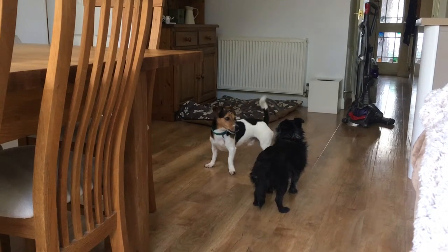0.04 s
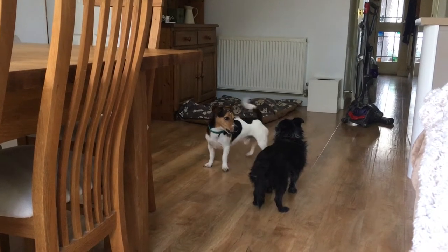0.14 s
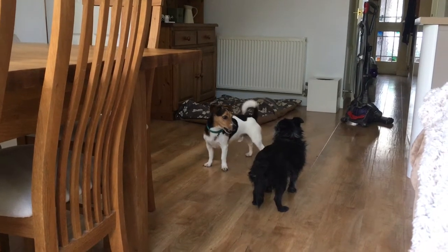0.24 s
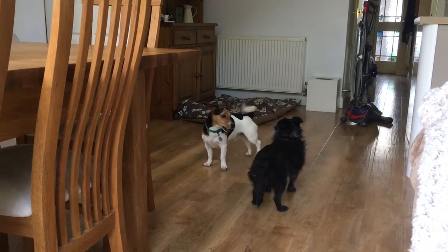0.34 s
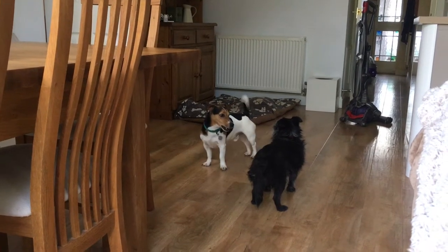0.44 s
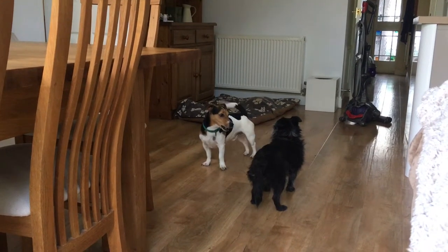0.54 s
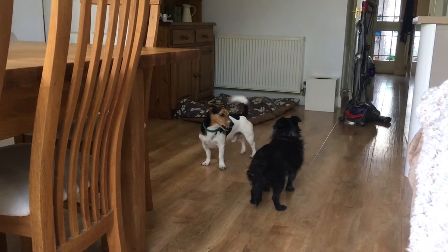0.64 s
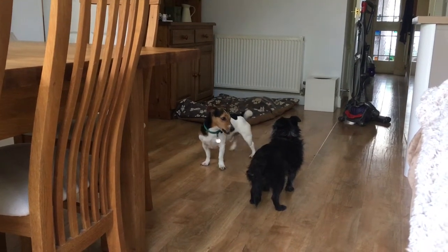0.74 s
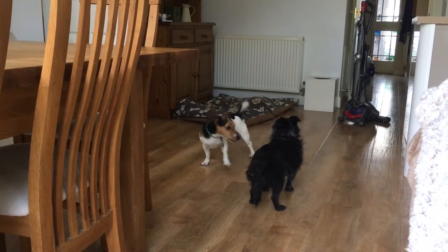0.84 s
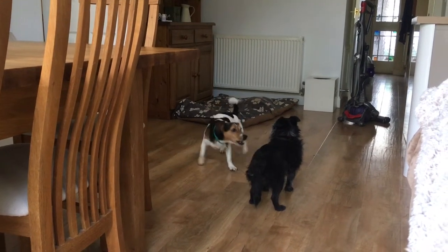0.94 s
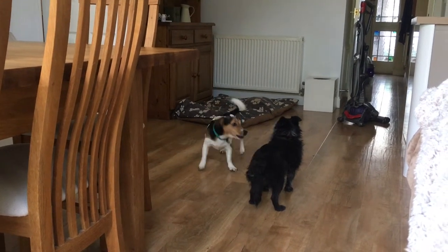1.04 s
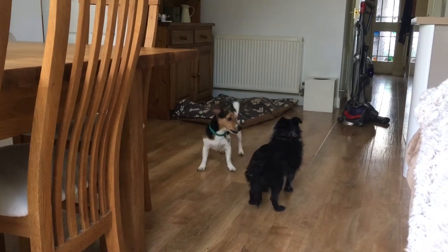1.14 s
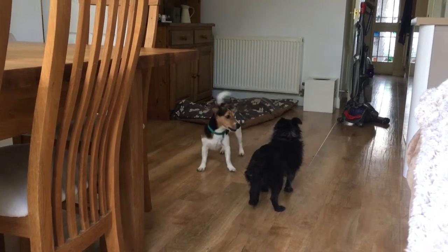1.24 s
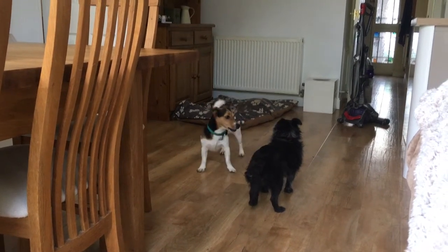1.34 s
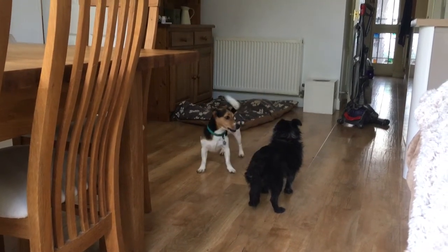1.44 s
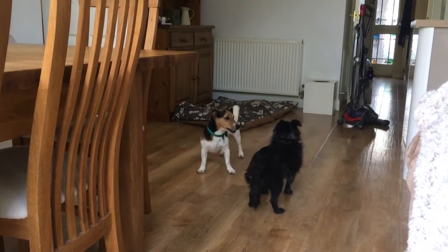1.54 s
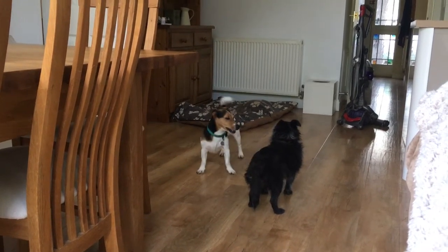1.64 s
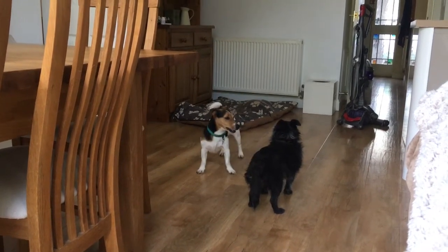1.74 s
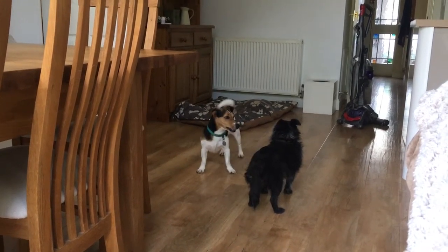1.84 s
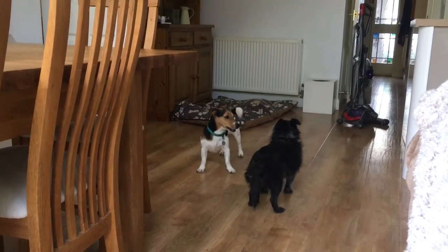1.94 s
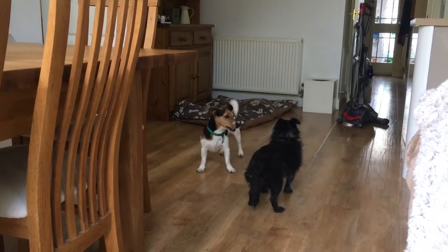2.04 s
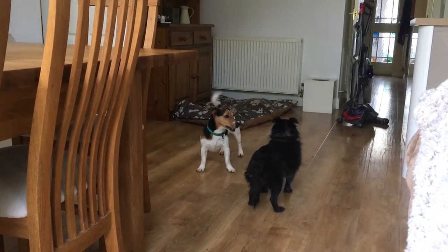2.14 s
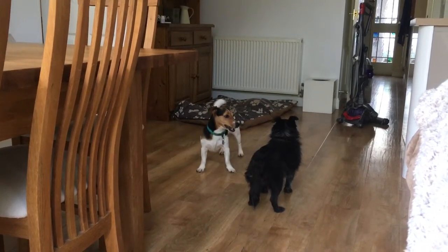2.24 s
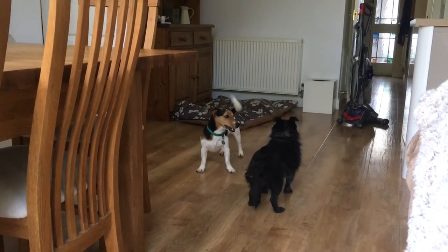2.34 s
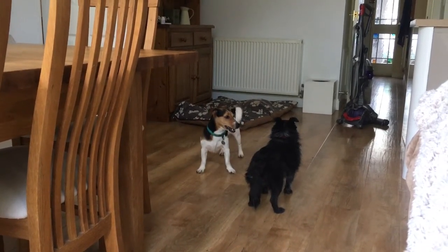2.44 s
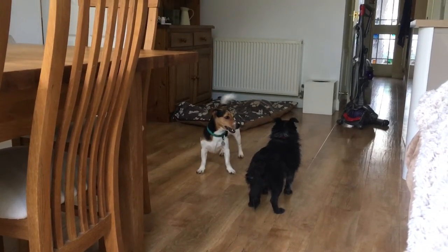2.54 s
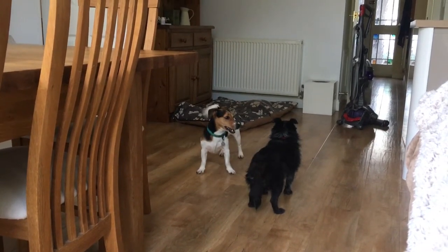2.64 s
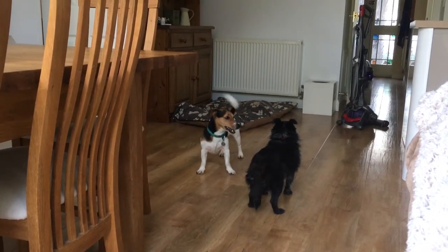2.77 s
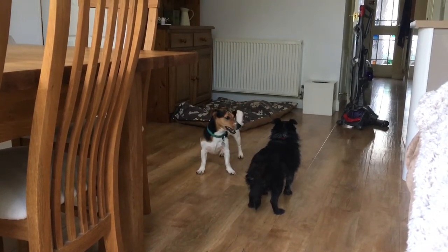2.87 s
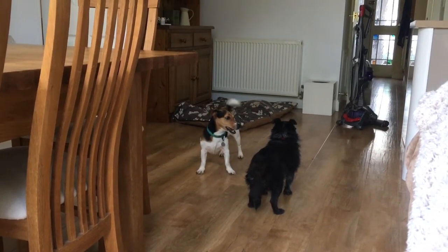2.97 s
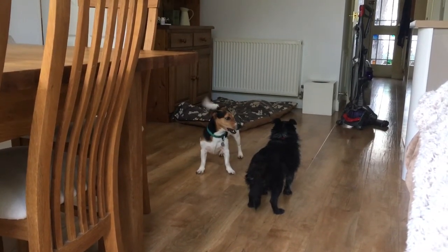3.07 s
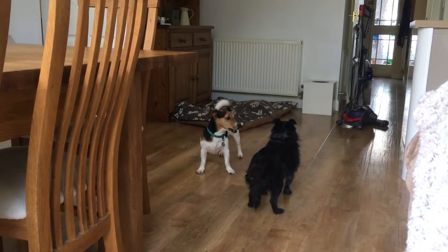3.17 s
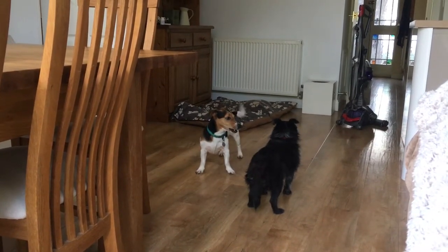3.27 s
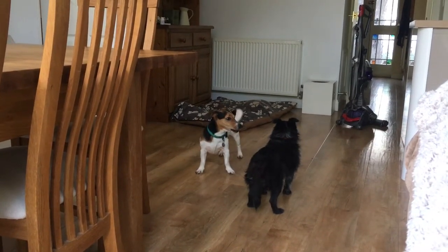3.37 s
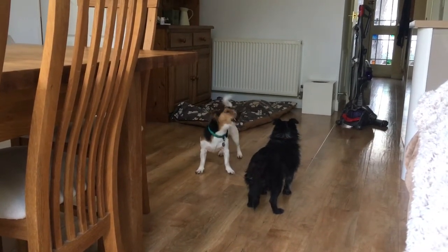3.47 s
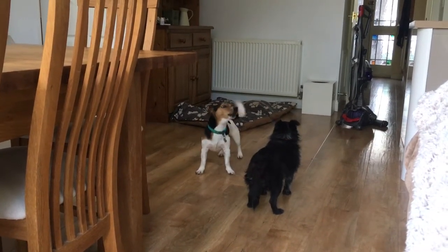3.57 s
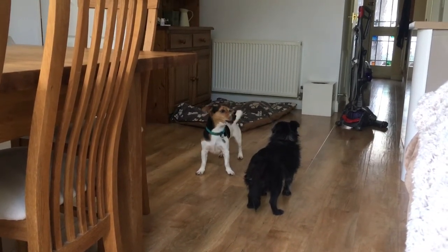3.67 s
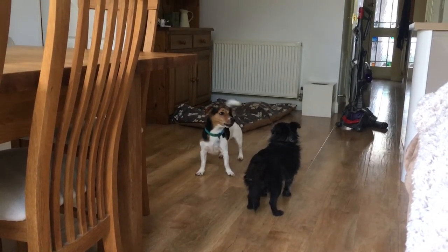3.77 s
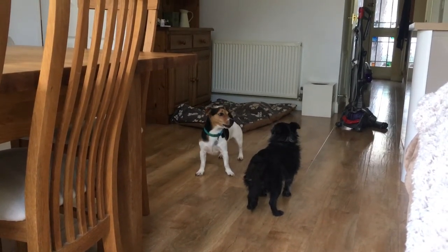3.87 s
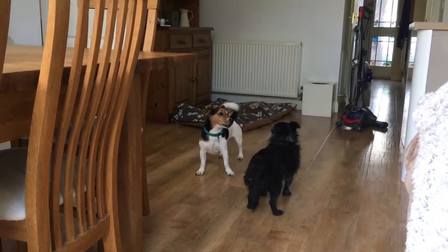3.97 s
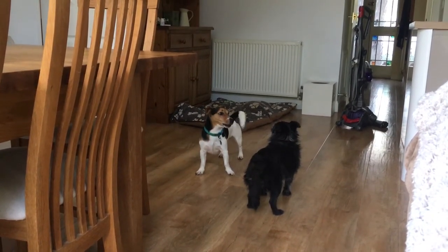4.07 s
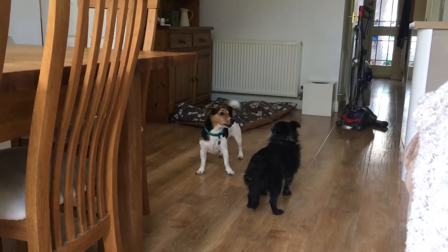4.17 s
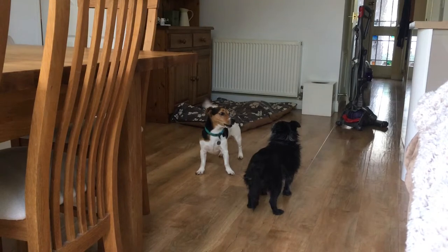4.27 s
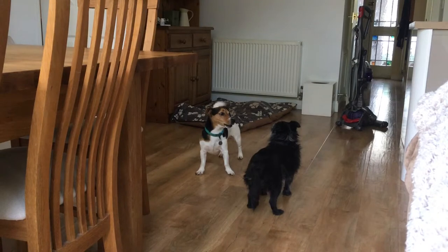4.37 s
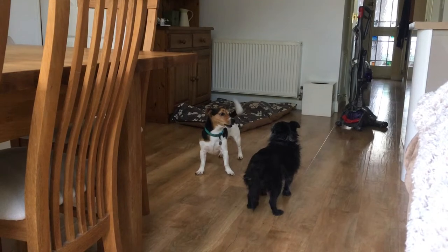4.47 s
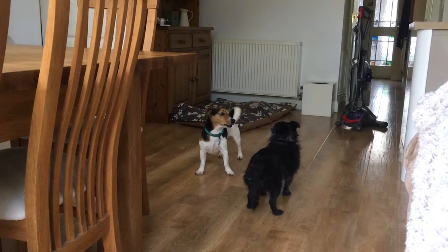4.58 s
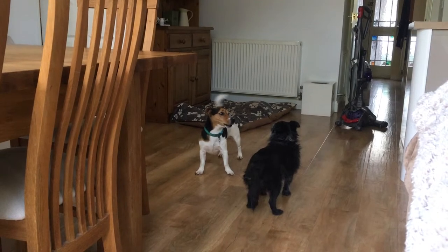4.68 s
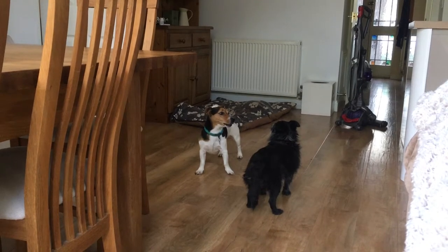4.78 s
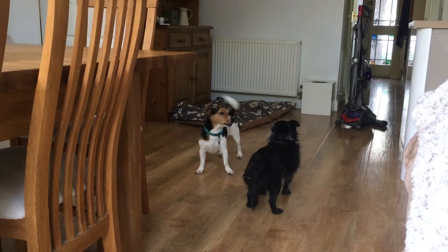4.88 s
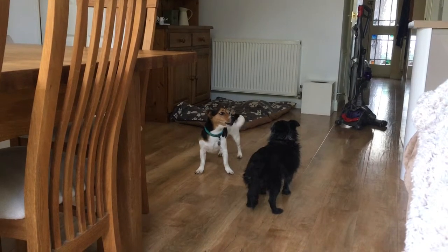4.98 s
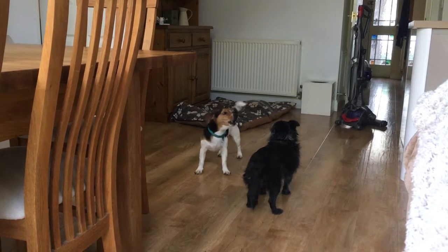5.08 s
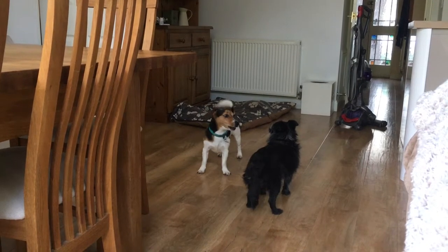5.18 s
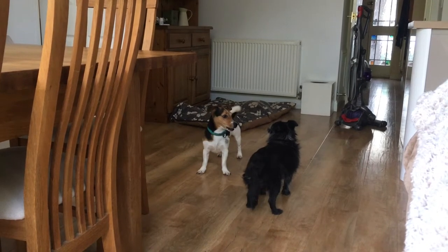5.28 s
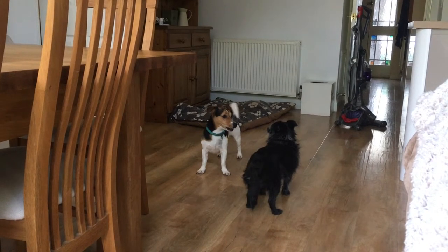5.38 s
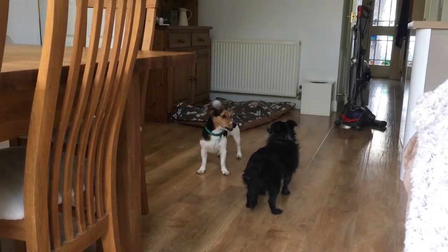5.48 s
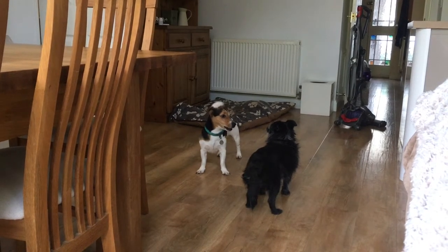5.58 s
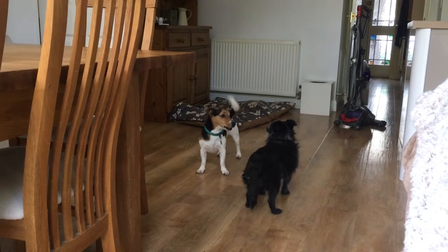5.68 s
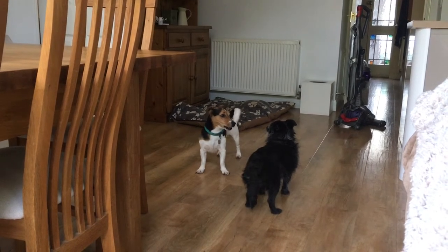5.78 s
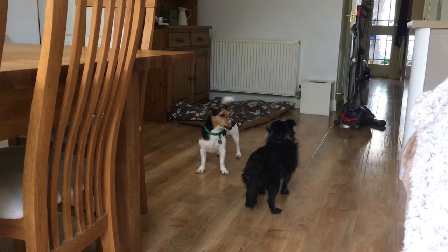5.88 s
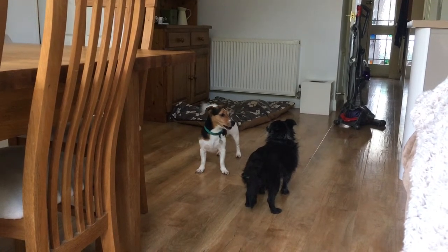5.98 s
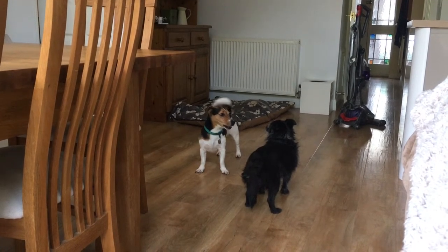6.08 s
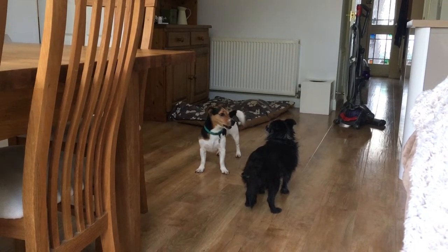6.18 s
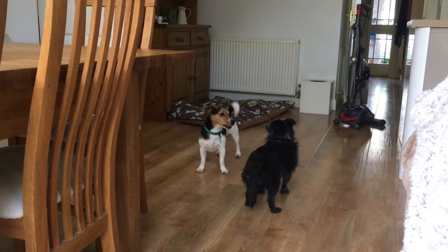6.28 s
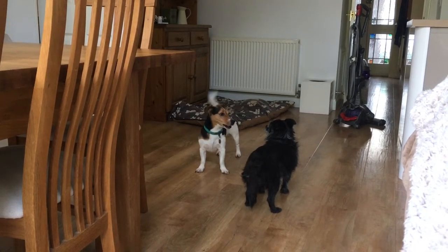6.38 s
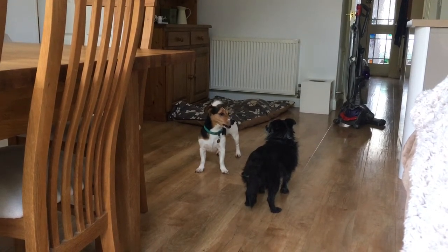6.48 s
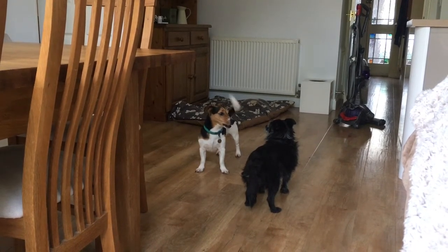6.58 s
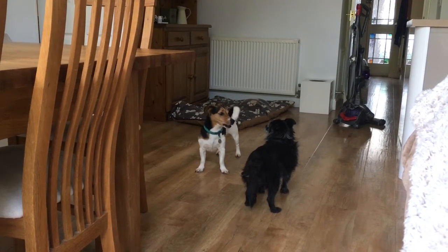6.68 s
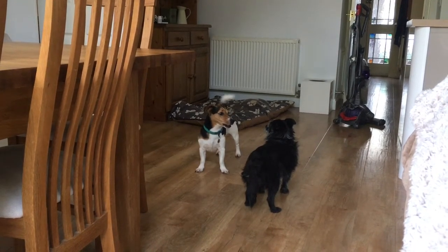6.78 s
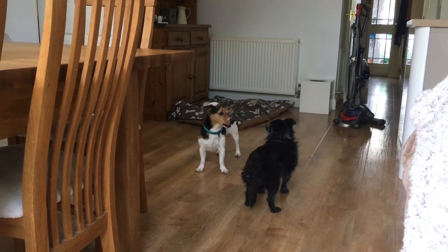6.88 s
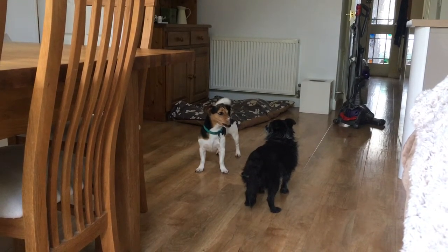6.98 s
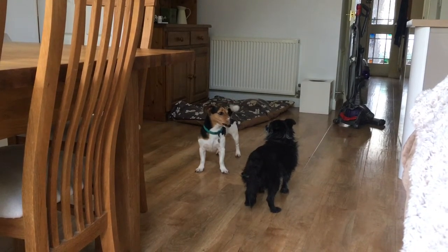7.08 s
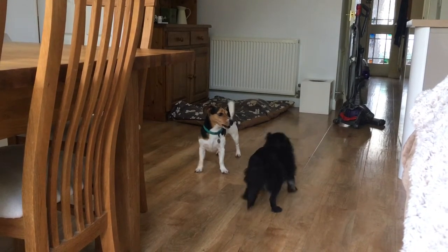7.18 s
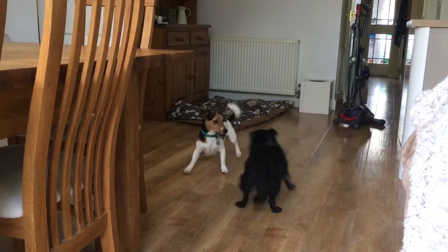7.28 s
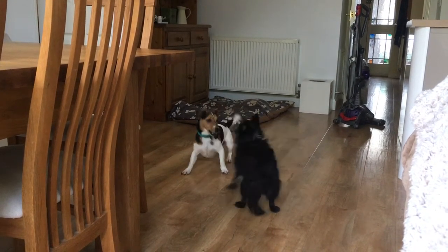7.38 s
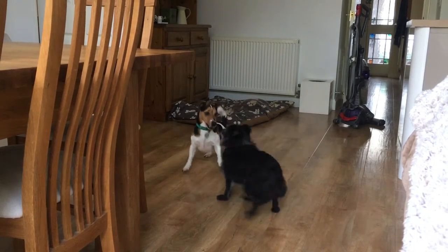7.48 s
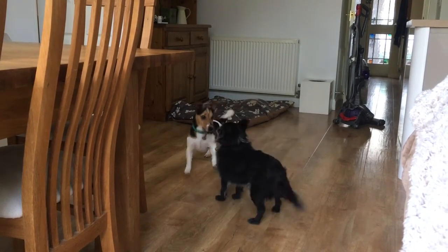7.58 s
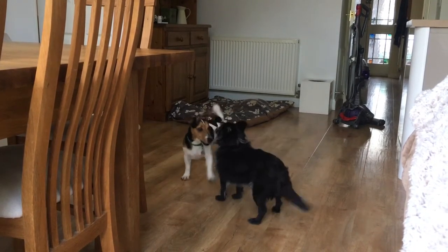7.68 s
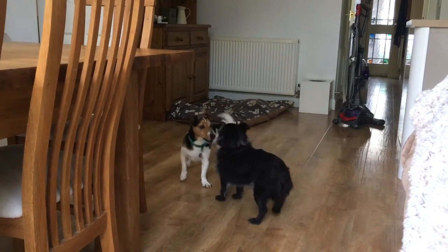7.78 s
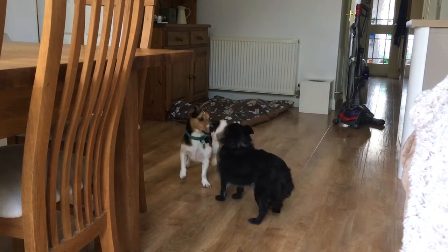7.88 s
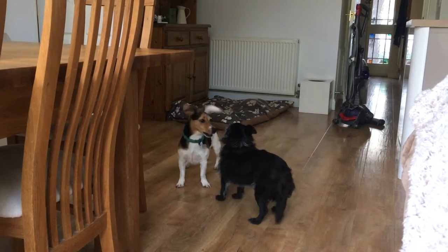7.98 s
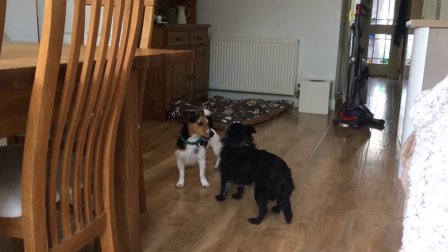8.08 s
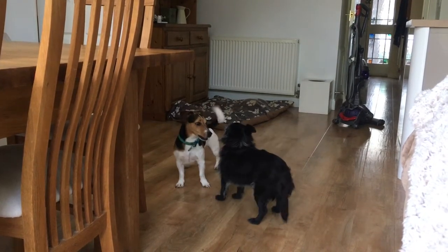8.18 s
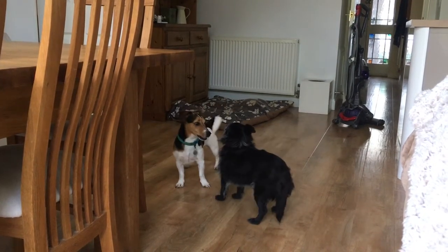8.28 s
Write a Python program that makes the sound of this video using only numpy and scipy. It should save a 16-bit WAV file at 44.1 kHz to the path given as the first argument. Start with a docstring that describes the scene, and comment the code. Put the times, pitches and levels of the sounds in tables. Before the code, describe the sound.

A small dog gives a low, gruff woof right at the start, with a tiny faint squeak behind it. At about 1 second comes a sharp, loud bark that rises out of a short growl and rings in the room. Two more follow at about 3.5 and 5 seconds, each led by a growl and ending in a small grunt, the last a little raspier. Between the barks the dog pants faintly and its collar tag tinkles now and then. Around 6.7 to 7 seconds there are soft thumps on the floorboards. From about 7.2 seconds another dog's paws skid on the wood, pads rubbing and claws clicking, and a metal tag rattles at around 8 seconds. These movements are much quieter than the barks. A faint low hum lies under everything.

```python
"""A gruff woof, then three sharp barks, each out of a growl: a small terrier faces another dog.
Vocal folds and breath drive its throat resonances; between barks it pants and its collar tag tinkles.
At the end the other dog skids forward on the wood floor: thumps, rubbing pads, clicking claws.
The room reverberates; a low hum lies under it all."""
import sys
import numpy as np
from scipy import signal
from scipy.fft import rfft, irfft
from scipy.io import wavfile
from scipy.ndimage import uniform_filter1d, minimum_filter1d

SR = 44100
rng = np.random.default_rng(int(sys.argv[2]) if len(sys.argv) > 2 else 0)


def put_to_file(sound):
    """Save the sound as 16-bit audio at rate SR, in the file named by the first command-line argument."""
    columns = np.atleast_2d(sound).T  # one column per channel
    safe = np.clip(columns, -1, 1)
    whole_steps = np.round(safe * 32767)
    wavfile.write(sys.argv[1], SR, whole_steps.astype(np.int16))


N = 366912

# growls: start_s, swell_s, fade_s, first_db, peak_db, first_flap_hz, peak_flap_hz,
# fall_after_peak_db, fade_db, mouth_db_per_oct, jaw_boost_db
GROWL_EVENTS = [(0, .02, .21, -21, -23, 140, 143, -1, -31.5, .5, 1),
                (.957, 0.03, .105, -42, -21, 150, 191, -8.5, -14, 1, 0),
                (3.412, .133, .135, -49, -25, 32, 180, -5.5, -15, 0.5, -7),
                (4.886, .19, .135, -57, -24.5, 32, 157, -9, -12, 0, -6)]
# throat resonances, mouth nearly shut: freq_hz, width_hz, gain_db
SHUT_THROAT_MODES = [(160.66, 62, 2.5), (275, 74, 0.5), (1780.4, 170, -21), (2380, 140, -31.5),
                     (3800, 350, -35), (5900, 520, -36.5), (9450, 1600, -33), (12200, 3200, -34)]
# resonances of the dropped jaw: freq_hz, width_hz, gain_db
JAW_MODES = [(593, 210, -6), (1020, 230, -7.5)]
# house air spectrum: freq_hz, density_db
AIR_SPECTRUM = [(12, -33.5), (20, -21.5), (30, -2.5), (53, 0.5), (116, -21), (158, -20), (410, -29),
                (527, -39), (718, -33.5), (1440, -41), (2670, -42), (7950, -43), (14700, -39),
                (16000, -43.5)]
# whines and grunts as the jaw closes: start_s, length_s, level_db, first_hz, last_hz
WHINE_EVENTS = [(0.134, 0.089, -48, 1793, 2291), (3.756, 0.059, -41.5, 357, 227),
                (5.288, 0.025, -38, 349, 213)]
# claw taps on the boards: start_s, level_db, scratch_t60_s
CLAW_TAPS = [(.223, -45.5, 0.063), (7.254, -39.5, 0.086), (7.371, -38.5, .042), (7.482, -43, .015),
             (7.527, -47, 0.053), (7.608, -43.5, 0.047), (7.655, -40.5, .016), (7.664, -40.5, 0.019),
             (7.734, -39, 0.0093), (7.833, -41, .012), (8.093, -49, 0.012)]
# claw scratch spectrum: freq_hz, gain_db
SCRATCH_SPECTRUM = [(300, -12), (2000, -13.5), (4000, -7.5), (6500, -3), (9000, 0), (9900, 5),
                    (10800, -1.5), (15000, 3), (16500, 1)]
# paws pushing off and sliding: peak_s, rise_s, fade_s, claw_db, pad_db
PAW_SLIDES = [(7.284, 0.056, 0.098, -44, -50.5), (7.386, 0.045, 0.074, -55, -51.5),
              (7.52, 0.14, 0.32, -53, -80), (7.9, 0.14, 0.3, -60, -88)]
# collar tag knocks: start_s, level_db
TAG_KNOCKS = [(.316, -53), (.429, -49.5), (.821, -51.5), (1.664, -52), (1.923, -48.5), (2.8, -66.5),
              (3.167, -54.5), (6.055, -62), (7.767, -48), (7.924, -33), (7.988, -38), (8.154, -35)]
# tag modes: freq_hz, gain_db, t60_s
TAG_MODES = [(8650, -7.5, 0.089), (8700, -8, 0.058), (8440, -5.5, .03), (11650, -18, 0.11),
             (13040, -20, 0.052)]
# pants: start_s, level_db
PANT_EVENTS = [(.595, -74.5), (0.784, -64), (1.759, -69), (2.165, -63), (2.537, -64.5), (2.894, -62.5),
               (3.299, -59), (4.558, -70), (5.718, -72), (7.515, -71.5), (7.763, -63), (8.21, -73.5)]
# open muzzle resonances: freq_hz, width_hz, gain_db
MUZZLE_MODES = [(700, 420, -3), (1500, 420, -1), (2560, 860, -2.5), (4940, 3000, -22)]
# barks: start_s, attack_s, hold_s, effort_db, top_pitch_hz, mouth_db_per_oct, hiss_db,
# throat_tuning_ratio, rasp_db
BARK_EVENTS = [(0.966, 0.056, 0.087, -8, 669, 2, -22.5, 0.97, -21),
               (3.521, 0.058, 0.1, -8, 651.8, -.5, -23.5, 0.95, -17.5),
               (5.05, .066, .097, -7.5, 634.9, -0.5, -21.5, 0.974, -12)]
# throat and mouth resonances in a bark: freq_hz, width_hz, gain_db, jaw_drop_gain_db
OPEN_THROAT_MODES = [(651, 130, -1, -0.5), (1159, 390, 0, 5.5), (1874, 120, 0.5, -2.5),
                     (2965, 190, -19.5, 1)]
# resonances of air past the teeth: freq_hz, width_hz, gain_db
TEETH_MODES = [(3990, 250, -8.5), (4560, 360, -2.5), (6480, 500, -3), (7500, 360, -7.5), (8580, 900, 1),
               (11080, 860, -4.5), (14000, 890, -6)]
# soft floor thumps: start_s, level_db
FLOOR_THUMPS = [(6.656, -49.5), (6.706, -48), (6.76, -56.5), (6.803, -51.5), (6.85, -55.5), (6.992, -53.5),
                (7.045, -58)]
# floorboard modes: freq_hz, gain_db, t60_s
BOARD_MODES = [(109.7, -4, 0.16), (144.8, 3.5, 0.068), (171.8, 5.5, 0.083), (232.2, -1, 0.095),
               (293, -2.5, 0.052), (595, -11.5, 0.047)]
# pad rub spectrum: freq_hz, gain_db
RUB_SPECTRUM = [(60, 6), (150, 7.5), (400, -16), (700, 1.5), (1000, -5.5), (1480, 7.5), (1900, -0.5),
                (2500, 7), (3500, -3), (7000, -19)]
# room decay: freq_hz, t60_s
ROOM_DECAY = [(100, .65), (300, 0.25), (650, 0.74), (1200, 0.63), (2000, 0.64), (3200, 0.68), (6000, 0.49),
              (9000, 0.49), (15000, 0.29)]


def amp(db):
    """Decibels to gain."""
    return 10 ** (np.asarray(db) / 20)


def unit(x):
    """Scale to rms 1."""
    return x / np.sqrt(np.mean(x ** 2) + 1e-20)


def ramp(t, start_s, length_s):
    """Linear rise from 0 to 1."""
    return np.clip((t - start_s) / length_s, 0, 1)


def arch(length_s):
    """Half-sine envelope."""
    return np.sin(np.linspace(0, np.pi, int(length_s * SR)))


def read(points, hz):
    """Interpolate a table over log frequency."""
    points_hz, values = np.transpose(points)
    return np.interp(np.log(hz + 1), np.log(points_hz + 1), values)


def add(mix, start_s, sound):
    """Mix a sound in at start_s."""
    part = mix[max(round(start_s * SR), 0):][:len(sound)]
    part += sound[:len(part)]


def noise(spectrum):
    """Scene-length shaped noise, rms 1."""
    gain = amp(read(spectrum, np.fft.rfftfreq(N, 1 / SR)))
    return unit(irfft(rfft(rng.standard_normal(N)) * gain, N))


def wander(n, cutoff_hz):
    """Low-passed random drift, rms about 1."""
    rolloff = 1 + (np.fft.rfftfreq(SR, 1 / SR) / cutoff_hz) ** 4
    return np.resize(unit(irfft(rfft(rng.standard_normal(SR)) / rolloff)), n)


def resonate(x, hz, width_hz):
    """Two-stage resonance, peak gain 1."""
    b, a = signal.iirpeak(hz, hz / width_hz, fs=SR)
    return signal.lfilter(b, a, signal.lfilter(b, a, x))


def tract(x, modes, lift_db_per_oct=0):
    """Parallel resonances, output levelled; an opening mouth lifts the upper ones."""
    voiced = sum(amp(db + lift_db_per_oct * np.log2(hz / modes[0][0])) * resonate(x, hz, width_hz)
                 for hz, width_hz, db in modes)
    return voiced / np.sqrt(abs(uniform_filter1d(voiced ** 2, size=1500)) + 1e-14)


def growls(jitter=0.11, slowing=0.29, fall_s=0.02, spread_db=5.5, closure_hz=1800):
    """Slack folds flap unevenly, speed up as the effort swells, then give way."""
    out = np.zeros(N)
    for (start_s, swell_s, fade_s, first_db, peak_db, first_hz, peak_hz,
         fall_db, fade_db, mouth_db_per_oct, jaw_db) in GROWL_EVENTS:
        t = np.arange(0, swell_s + fade_s, 1 / SR)
        n = len(t)
        swell, fade = ramp(t, 0, swell_s) ** 1.5, ramp(t, swell_s, fade_s)
        level_db = first_db + (peak_db - first_db) * swell
        level_db += fall_db * ramp(t, swell_s, fall_s) + fade_db * fade
        flap_hz = first_hz * (peak_hz / first_hz) ** swell * (1 - slowing * fade)
        cycles = np.cumsum(flap_hz * (1 + jitter * wander(n, 70))) / SR
        flaps = np.diff(np.floor(cycles), prepend=-1) * np.sqrt(SR / flap_hz)
        flaps *= amp(spread_db * wander(n, 100))
        flaps = signal.lfilter(*signal.butter(2, closure_hz, fs=SR), flaps)  # soft closure
        puffs = unit(np.exp(-(cycles % 1) / 0.5) * rng.standard_normal(SR)[:n])
        throat = SHUT_THROAT_MODES + [(hz, width_hz, db + jaw_db) for hz, width_hz, db in JAW_MODES]
        add(out, start_s, amp(level_db) * tract(flaps + puffs, throat, mouth_db_per_oct - (1 - swell)))
    return out


def background(hum_hz=48, hum_db=-63.5, waver_db=-8, air_db=-66.5):
    """Wavering low hum and quiet house air."""
    tone = unit(np.sin(2 * np.pi * hum_hz * np.arange(N) / SR))
    waver = unit(resonate(rng.standard_normal(N), hum_hz, width_hz=7))
    air = signal.sosfilt(signal.butter(4, 70, "high", fs=SR, output="sos"), noise(AIR_SPECTRUM))
    return amp(air_db) * unit(air) + amp(hum_db) * unit(tone + amp(waver_db) * waver)


def whines(jitter=0.045, octave_db=-16):
    """Thin unsteady glides with a weak octave."""
    out = np.zeros(N)
    for start_s, length_s, level_db, first_hz, last_hz in WHINE_EVENTS:
        flow = arch(length_s)
        pitch_hz = np.linspace(first_hz, last_hz, len(flow)) * (1 + jitter * wander(len(flow), 600))
        phase = 2 * np.pi * np.cumsum(pitch_hz) / SR
        tone = unit(np.sin(phase) + amp(octave_db) * np.sin(2 * phase))
        add(out, start_s, amp(level_db) * flow * tone)
    return out


def slide(peak_s, rise_s, fade_s, edge_db=-16.5):
    """Sliding paw force: at edge_db one rise before and one fade after the peak."""
    t = np.arange(N) / SR - peak_s
    return amp(edge_db * np.maximum(-t / rise_s, t / fade_s))


def claws(grain_db=3):
    """Claws tap and scratch the boards, and scrape grainily in a slide."""
    taps, t = np.zeros(N), np.arange(SR // 8) / SR
    for start_s, level_db, t60_s in CLAW_TAPS:
        add(taps, start_s, amp(level_db - 60 * t / t60_s))
    scrape = sum(amp(claw_db) * slide(*timing) for *timing, claw_db, _ in PAW_SLIDES)
    grain = unit(amp(grain_db * wander(N, 360)))
    return (taps + scrape * grain) * noise(SCRATCH_SPECTRUM)


def strikes(blows, modes, rise_s, spread_db=1.3):
    """Each blow rings the same modes at slightly different strengths."""
    out, t = np.zeros(N), np.arange(SR // 3) / SR
    for start_s, level_db in blows:
        ring = np.zeros(len(t))
        for hz, db, t60_s in modes:
            decay = amp(db + rng.normal(0, spread_db) - 60 * t / t60_s)
            ring += decay * np.sin(2 * np.pi * (hz * t + rng.random()))
        add(out, start_s, amp(level_db) * ring * (1 - np.exp(-t / rise_s)))
    return out


def collar_tag(rattle_s=7.87, gap_s=0.028, rattle_db=-46, spread_db=3, bounces=6):
    """The tag knocks now and then, and rattles unevenly as the dogs meet."""
    rattle = [(rattle_s + gap_s * (k + 0.27 * late), rattle_db + spread_db * loud)
              for k, (late, loud) in enumerate(rng.standard_normal((bounces, 2)))]
    return strikes(TAG_KNOCKS + rattle, TAG_MODES, rise_s=0.0024)


def pants(length_s=0.18):
    """Short puffs of air through the open muzzle."""
    flow = np.zeros(N)
    for start_s, level_db in PANT_EVENTS:
        add(flow, start_s, amp(level_db) * arch(length_s))
    return flow * tract(rng.standard_normal(N), MUZZLE_MODES)


def swirl(x, depth_db=4, above_hz=2200):
    """Turbulence gathers in passing whistles."""
    hz, _, spectra = signal.stft(x, SR, nperseg=512, noverlap=384)
    patches = uniform_filter1d(rng.standard_normal((len(hz), 128)), 4, axis=0)
    patches = unit(uniform_filter1d(patches, 12, axis=1))[:, :spectra.shape[1]]
    spectra *= amp(depth_db * patches * (hz[:, None] > above_hz))
    return unit(signal.istft(spectra, nperseg=512, noverlap=384)[1][:len(x)])


def barks(release_s=0.07, jitter=0.03, rasp_hz=3136, rasp_width_hz=170):
    """Jittery folds and puffs of air drive the throat; air hisses past the teeth."""
    out = np.zeros(N)
    for (start_s, attack_s, hold_s, top_db, top_hz,
         mouth_db_per_oct, hiss_db, tuning, rasp_db) in BARK_EVENTS:
        t = np.arange(0, attack_s + hold_s + release_s, 1 / SR)
        n = len(t)
        onset = 1 - ramp(t, 0, attack_s)
        held = ramp(t, attack_s, hold_s)
        release = ramp(t, attack_s + hold_s, release_s)
        effort_db = top_db - 34 * onset ** 1.6 - 6 * held - 25.5 * release
        pitch_hz = top_hz * (1 - 0.2 * onset ** 1.3 - 0.1 * held ** 2 - 0.16 * release)
        roughness = 0.45 + 0.34 * (onset + release)
        lift_db_per_oct = mouth_db_per_oct - 16 * onset + 2.5 * held - 5.5 * release
        cycles = np.cumsum(pitch_hz * (1 + jitter * wander(n, 220))) / SR
        flutter = 1 + wander(n, 300)
        folds = unit(flutter * sum(np.cos(2 * np.pi * k * cycles) for k in range(1, 9)))
        puffs = swirl((0.5 + np.exp(-(cycles % 1) / 0.16)) * rng.standard_normal(SR)[:n])
        throat = [(hz * tuning, width_hz, db + jaw_db * held)
                  for hz, width_hz, db, jaw_db in OPEN_THROAT_MODES]
        throat.append((rasp_hz, rasp_width_hz, rasp_db))
        voice = tract((1 - roughness) * folds + 2 * roughness * puffs, throat, lift_db_per_oct)
        # hiss swells after the voice and fades before it
        teeth_db = hiss_db - 9 * onset - 12.5 * release + 0.5 * lift_db_per_oct + 2 * wander(n, 81)
        hiss = amp(teeth_db) * tract(puffs, TEETH_MODES)
        add(out, start_s, amp(effort_db) * (voice + hiss))
    return out


def thumps():
    """Soft blows ring the floorboards."""
    return strikes(FLOOR_THUMPS, BOARD_MODES, rise_s=0.0026)


def pads():
    """Paw pads rub the boards as the dog pushes off."""
    force = sum(amp(pad_db) * slide(*timing) for *timing, _, pad_db in PAW_SLIDES)
    return force * noise(RUB_SPECTRUM)


def room(x, early_db=4, early_s=0.019, density=0.15):
    """Dense reflections, strongest from near floor and walls; each band decays at its own rate."""
    taps = rng.standard_normal(SR) * (rng.random(SR) < density)
    taps[:SR // 400 + 1] = 0  # 2.5 ms pre-delay
    hz, t, spectra = signal.stft(taps, SR, nperseg=256)
    decay = amp(early_db * np.exp(-t / early_s) - 60 * t / read(ROOM_DECAY, hz)[:, None])
    decay /= np.linalg.norm(decay, axis=1, keepdims=True)
    tail = signal.istft(spectra * decay, SR, nperseg=256)[1]
    return signal.fftconvolve(x, tail / np.linalg.norm(tail))[:N]


def scene():
    """Mono mix: the voice fills the room; paws and tag are drier."""
    voice = barks() + growls() + whines() + pants()
    movement = claws() + collar_tag() + amp(-2) * thumps() + pads()
    direct = amp(-1) * voice + amp(-1.5) * movement
    reflected = room(amp(-5.5) * voice + amp(-8.5) * movement)
    return (direct + reflected + background())[None]


def record(dry, ceiling=0.77, hold_s=0.0023, cutoff_hz=15850):
    """Fast limiter on the bark peaks, then a low-pass."""
    hold = int(hold_s * SR)
    gain = minimum_filter1d(np.minimum(1, ceiling / (abs(dry) + 1e-9)), hold)
    limited = dry * uniform_filter1d(gain, hold)
    lowpass = signal.firwin(511, cutoff_hz, window=("kaiser", 9), fs=SR)
    return signal.oaconvolve(limited, lowpass[None], "same")


dry = scene()
out = record(dry)
put_to_file(out)
```